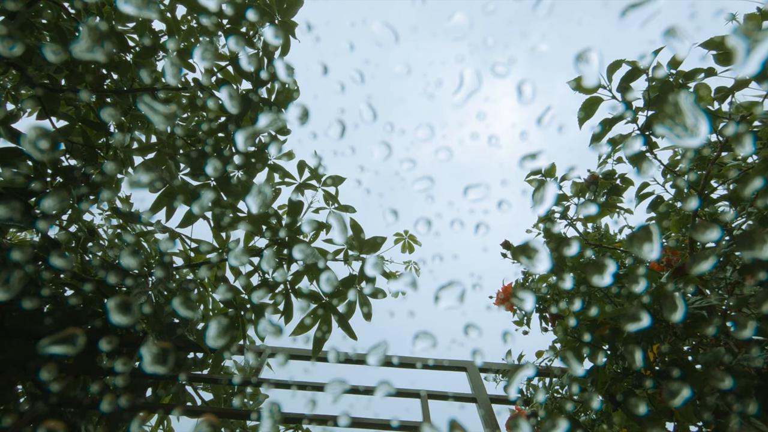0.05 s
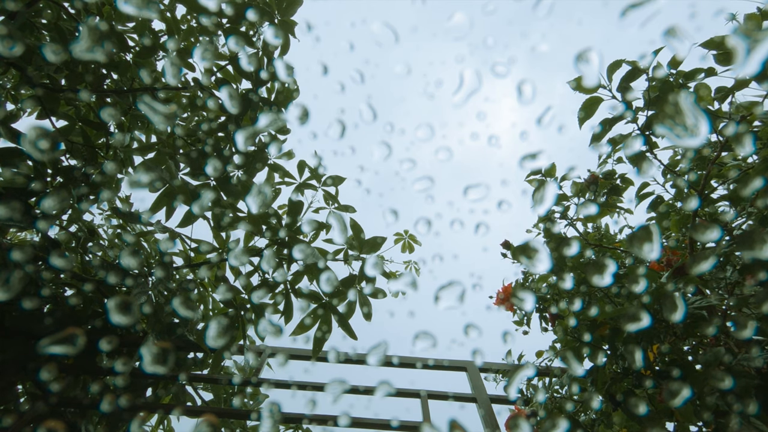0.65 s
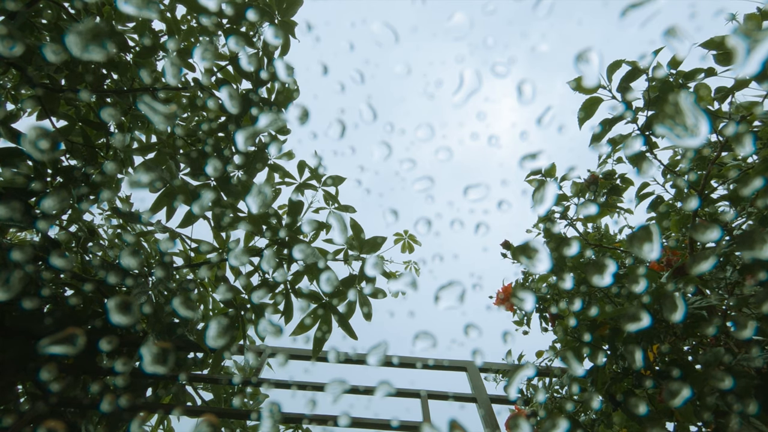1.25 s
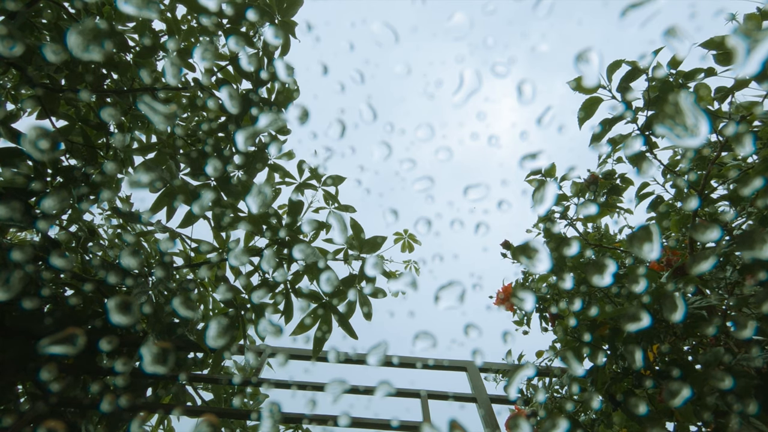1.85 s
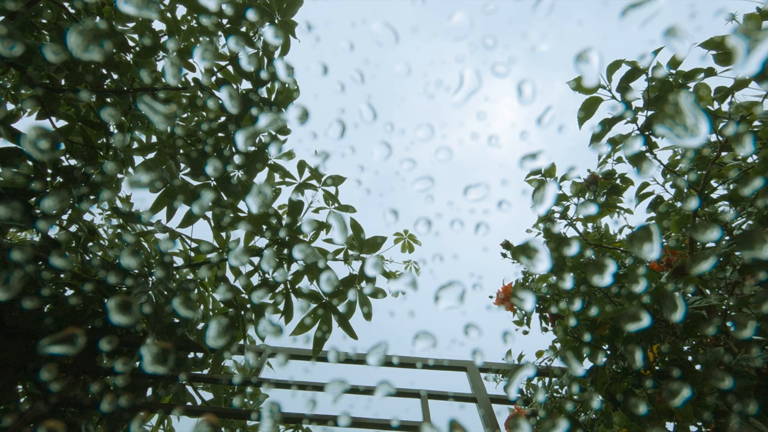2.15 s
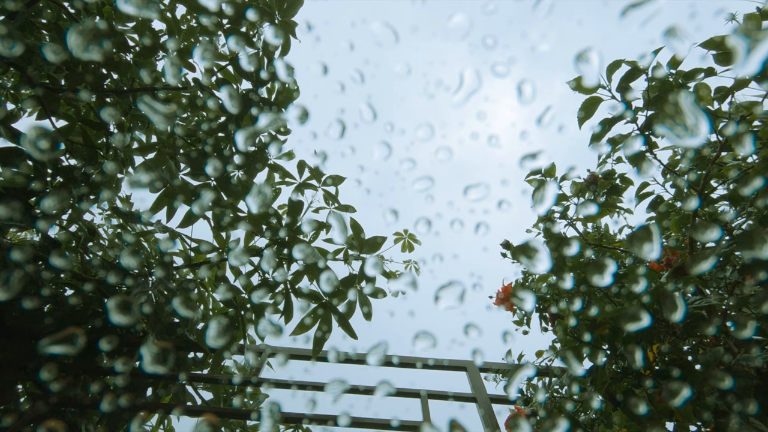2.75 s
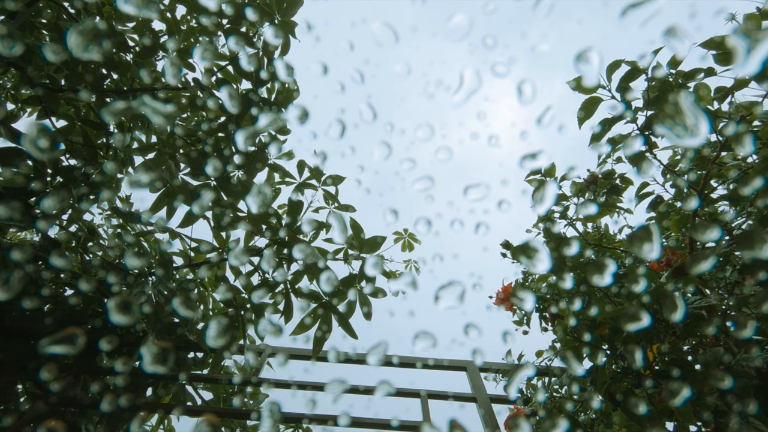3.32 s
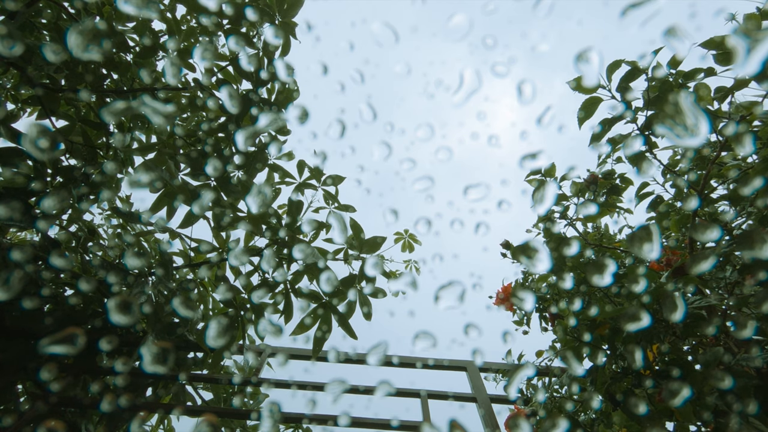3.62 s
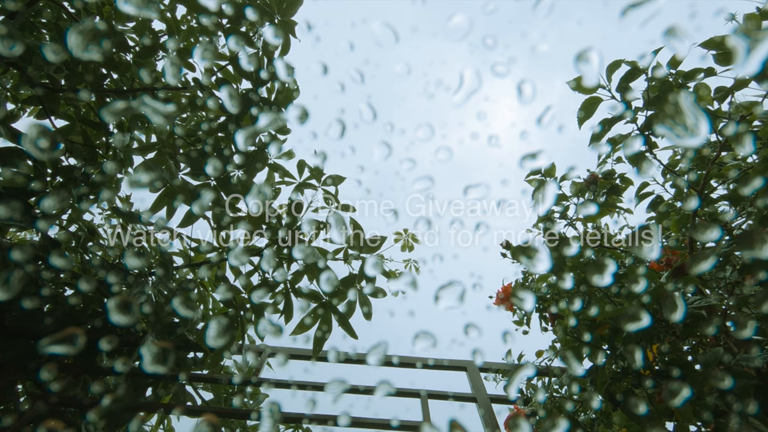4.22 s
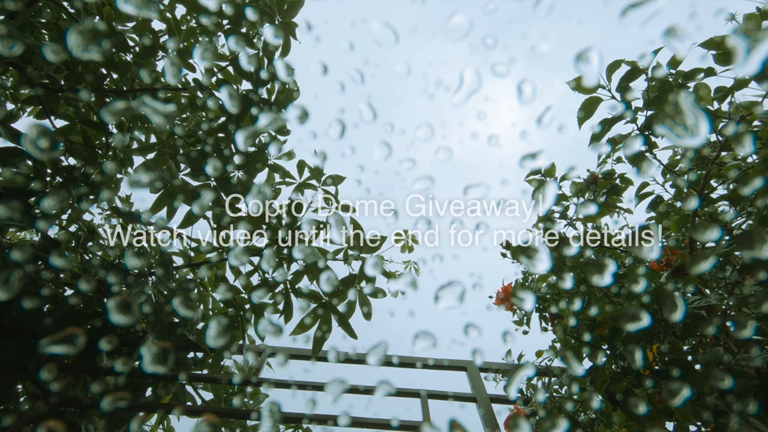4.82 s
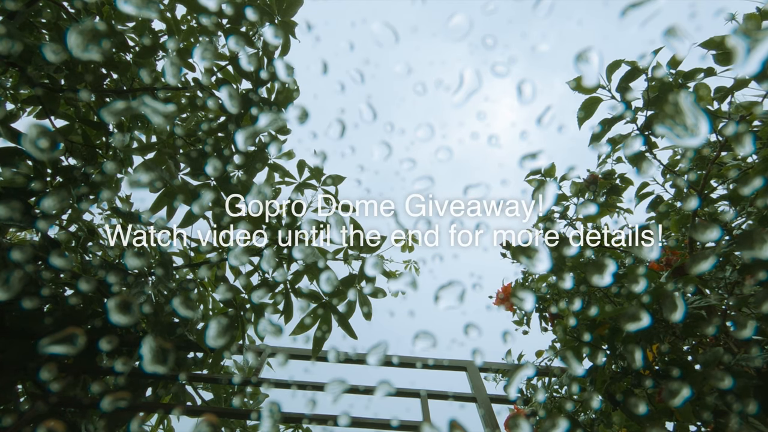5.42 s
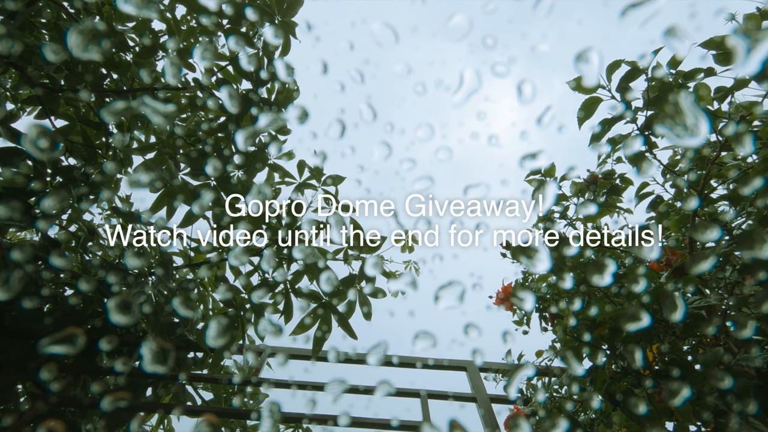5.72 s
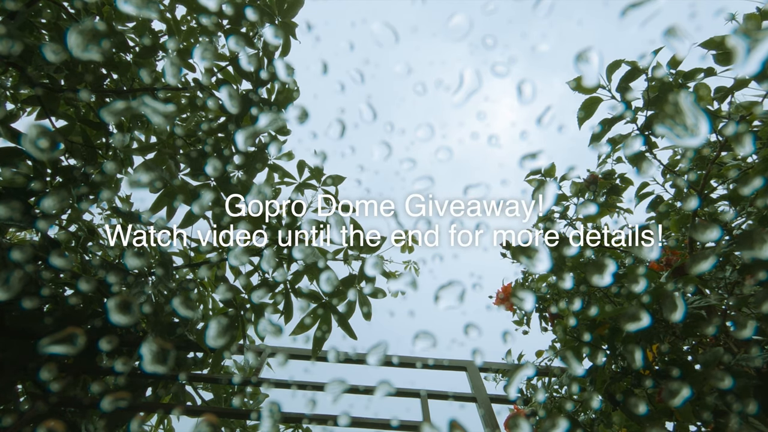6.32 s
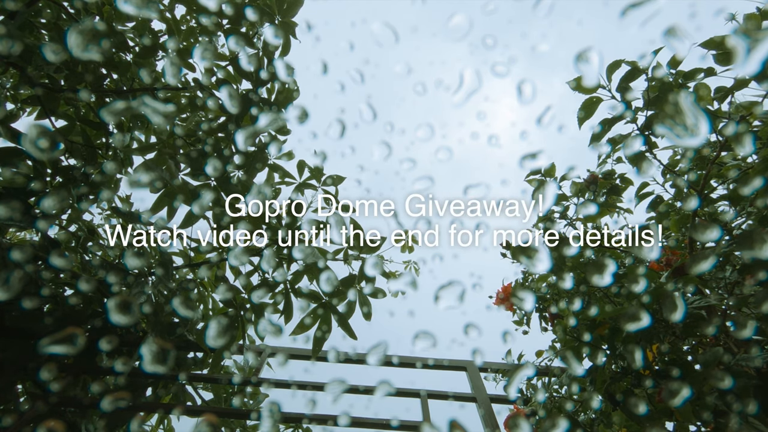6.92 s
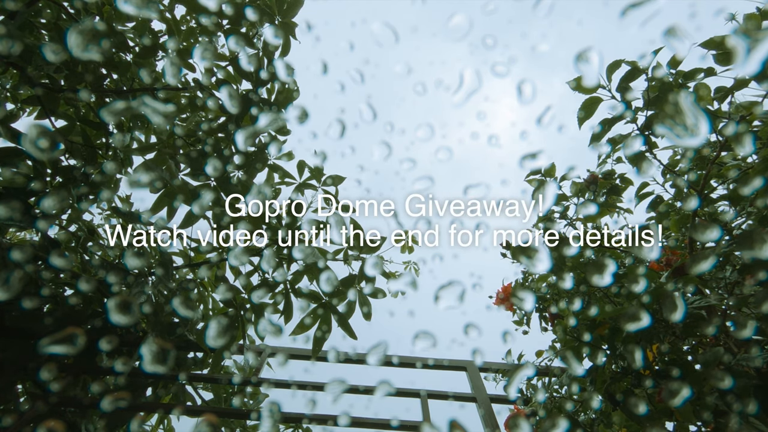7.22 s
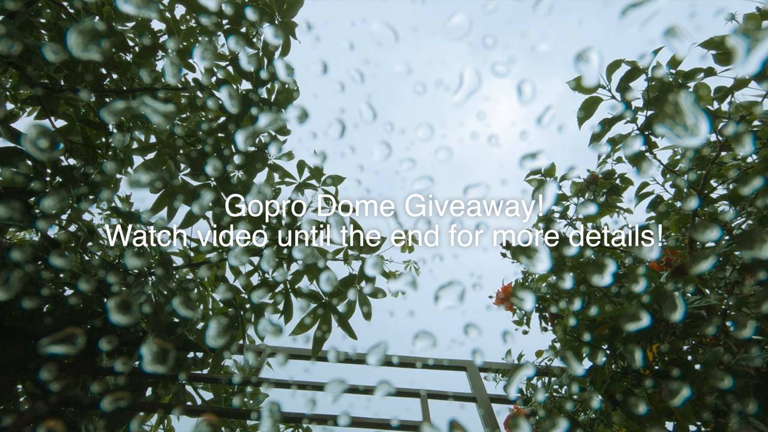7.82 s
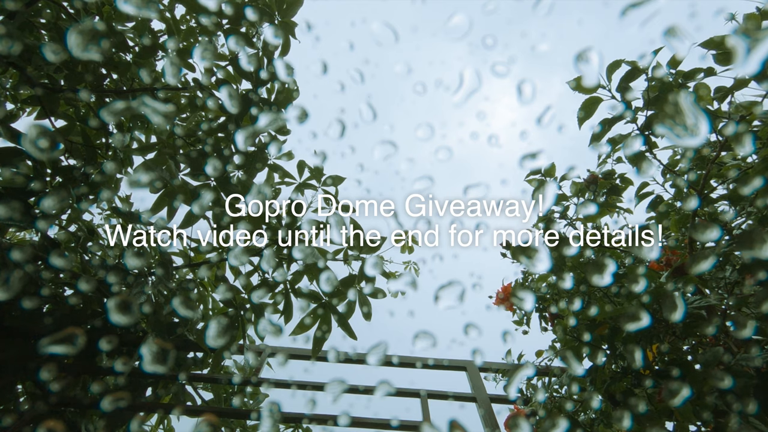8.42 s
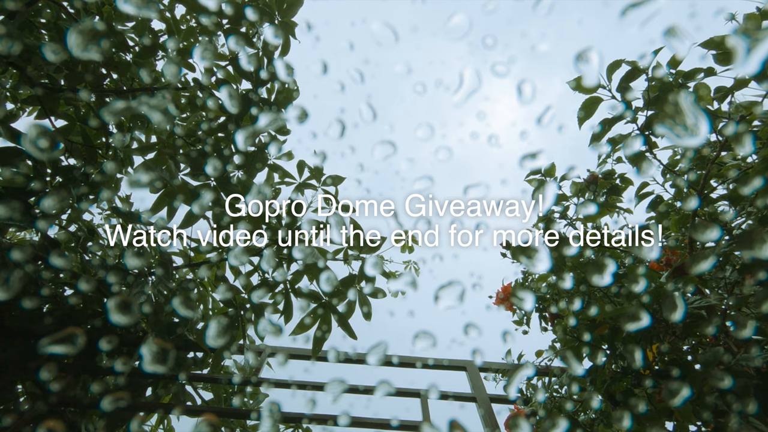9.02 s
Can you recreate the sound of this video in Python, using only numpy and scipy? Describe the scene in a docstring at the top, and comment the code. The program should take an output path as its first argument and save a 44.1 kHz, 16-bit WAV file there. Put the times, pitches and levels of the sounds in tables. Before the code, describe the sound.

Raindrops crack and tick unevenly on a plastic housing around the microphone, some bright, some dull, rocking it with small thumps. One early hit stands out, and the tapping carries on in clusters and short gaps. Small bubbly plops and fizzy splashes come from close by. Behind them are muffled outdoor drizzle, a faint hum and a low rumble that swells with puffs of air.

```python
"""Light rain outdoors, heard from inside a plastic dome housing. From the start, far rain comes dully through
the shell over a low rumble and a faint hum; fine spray ticks. Nearby drips plop, the low ones trapping a
bubble, the high ones tapping on leaves. From 0.07 s on, drops crack on the shell, ring it briefly and rock the
housing in a low thump, hardest at 1.9 s. In between, heavy drips burst into spray and soft low thuds nudge the
mount."""
import sys
import numpy as np
from scipy import signal
from scipy.fft import rfft, irfft, next_fast_len
from scipy.io import wavfile
from scipy.ndimage import map_coordinates

SR = 44100
rng = np.random.default_rng(int(sys.argv[2]) if len(sys.argv) > 2 else 0)


def store_pcm(level_fs):
    """Save levels as 16-bit WAV."""
    pcm = np.round(np.clip(level_fs, -1, 1) * 32767).astype(np.int16)
    wavfile.write(sys.argv[1], SR, np.atleast_2d(pcm).T)


N = 399537

# drops on the dome, relative levels: t/s, knock/dB, clack/dB, brightness/(dB/oct), thump/dB, spot f/Hz
DOME_DROPS = [(0.0707, -40.5, -51, -3.5, -38, 3360.0), (0.1247, -45.5, -51, -1, -41, 3290),
              (0.185, -41, -58, -15, -44.5, 2050), (0.2016, -38, -55.5, 0, -42.5, 3330),
              (0.265, -47, -47.5, -0.5, -44, 2420.0), (0.347, -40, -45, 2.5, -30, 3200),
              (0.3815, -37, -52.5, -15, -47, 2040), (0.4404, -50, -58.5, 0.5, -40.5, 2110),
              (0.5323, -45, -61.5, -9, -40, 2080), (0.599, -39, -59, 0, -40.5, 2030),
              (0.6722, -41.5, -58.5, -1.5, -44, 1430), (0.8042, -48, -51.5, -1, -41.5, 3320),
              (0.8858, -42.5, -52, -6, -46.5, 1790), (1.153, -42, -46.5, -5, -41, 2320),
              (1.1922, -36, -44, -7.5, -30, 3550), (1.221, -46, -61, -6, -36, 1680),
              (1.357, -45.5, -57.5, -4, -40, 1840), (1.603, -49, -56.5, -10, -40.5, 1820),
              (1.778, -46, -56, -15, -41, 2130), (1.8848, -44, -52.5, 8, -52, 3460),
              (1.896, -36, -52, -2, -27.5, 1970), (1.9406, -23, -32, 3, -18.5, 3550),
              (2.1147, -33.5, -44, 0.5, -34.5, 2420), (2.1817, -39, -42.5, -1.5, -31, 2400),
              (2.2155, -37, -47.5, 1, -30.5, 1620), (2.25, -45.5, -58, 4, -30.5, 3480.0),
              (2.5147, -42, -54.5, 10, -35.5, 3450), (2.5394, -46, -54.5, -3, -40, 2310.0),
              (2.702, -43, -60, -4, -37, 1450), (2.783, -48, -46, -2.5, -41.5, 2050),
              (2.8182, -40.5, -50.5, 0, -53, 2050.0), (2.946, -43.5, -50.5, 1.5, -38.5, 3540),
              (3.079, -39, -48, -1, -34.5, 3180), (3.0937, -30, -41.5, 0.5, -24.5, 3400),
              (3.5884, -62, -50, -2.5, -35, 2100), (3.738, -45.5, -60, 9, -38, 3900),
              (3.8851, -50, -62.5, 4.5, -41.5, 2040), (4.1135, -59, -51, -3, -36.5, 1820),
              (4.13, -38, -53, 0.5, -48, 2180), (4.2265, -32, -52, 5, -26.5, 3170),
              (4.2522, -47, -62, 8.5, -30.5, 3150.0), (4.2881, -42, -48.5, -5.5, -30, 3420),
              (4.3417, -43.5, -51, -1, -35, 3500), (4.459, -48, -57.5, 4, -44, 3270),
              (4.4819, -37.5, -45.5, -4.5, -37, 1540), (4.527, -39.5, -49, 0, -38.5, 2020.0),
              (4.5647, -45.5, -52.5, 2, -35, 3350), (4.764, -39.5, -54, -1, -38.5, 1560),
              (5.0131, -41.5, -57, -1, -39, 3500), (5.0865, -31.5, -39, 0, -28.5, 1560),
              (5.1405, -46.5, -59.5, -9, -38, 2330), (5.1967, -42, -54.5, 5.5, -55.0, 3440),
              (5.205, -51, -52, 6, -30, 3450.0), (5.229, -36, -60.5, 14.5, -33.5, 2900),
              (5.536, -43.5, -48, -2.5, -41.5, 1640.0), (5.978, -42, -50.5, -14, -35, 1830),
              (6.0828, -35, -40, -2, -24.5, 2455), (6.176, -43.5, -46.5, -2, -45, 1660),
              (6.237, -38.5, -50.5, 3, -39.5, 2030.0), (6.396, -47, -48.5, -0.5, -41.5, 2200),
              (6.5511, -45.5, -48.5, -4.5, -46, 1980), (6.7407, -37.5, -52.5, -0.5, -39.5, 1530),
              (6.7797, -38.5, -51.5, 1.5, -36.5, 3300), (6.975, -48, -55, -4.5, -56, 1560),
              (7.0182, -44, -48, -11, -45, 2120), (7.077, -33.5, -43.5, 0.5, -28, 3450),
              (7.2473, -44.5, -62.5, 5.5, -42.5, 1880), (7.6762, -30, -45, 3, -31, 2150),
              (7.689, -39, -42.5, 2, -45, 2430), (7.768, -54, -45.5, -6.5, -48, 2010),
              (7.867, -37.5, -49, 0, -36.5, 1520), (7.9456, -39, -49.5, 8, -32, 3360),
              (7.9767, -38.5, -52, 3.5, -39.5, 3350), (8.0866, -45, -47.5, -0.5, -41, 3400),
              (8.2047, -41.5, -55, -1.0, -42, 2310), (8.2964, -42.5, -56, -4.5, -60, 3100),
              (8.4988, -36.5, -56, -4, -29.5, 1620), (8.643, -51, -59.5, -2.5, -41, 1770),
              (8.7581, -49, -49.5, 4, -37, 3560), (8.866, -39, -49, 3.5, -34.5, 3320),
              (8.8761, -40, -48, 3, -36.5, 3400), (8.9414, -48, -54, 2.5, -43, 2480)]
# impact bands (knock, clack, tick, snap): low f/Hz, high f/Hz, t60/s, scatter/dB
IMPACT_BANDS = [(350, 1330, 0.017, -14), (1270, 5550, 0.014, -18.5), (4090, 10050, 0.014, -22.5),
                (8500, 12900, 0.011, -24.5)]
# shell response: f/Hz, mid/dB, side/dB
SHELL_COLOUR = [(294, 21.5, 28), (546, 15, 27.5), (690, 28.5, 35.5), (927, 32, 44.5), (1085, 24.5, 36.5),
                (1690, 26, 28.5), (2424, 31, 4), (2540, 20.5, 22.5), (3346, 25.5, 23), (4010, 13, 5),
                (5150, 9, 14.5), (7270, 10.5, 11.5), (10000, -1.5, -6.5), (13900, -17.5, -13)]


def amp(db):
    """Decibels to gain."""
    return 10 ** (np.asarray(db) / 20)


def unit(x):
    """x at rms 1."""
    return x / np.sqrt(np.mean(x ** 2) + 1e-20)


def wobble(rate_hz):
    """Smooth random curve with knots at rate_hz."""
    knots = rng.standard_normal(int(N * rate_hz / SR) + 4)
    return map_coordinates(knots, [np.arange(N) * rate_hz / SR])


def add(track, at_s, sound):
    """Mix a stereo sound into the track."""
    start = int(np.clip(round(at_s * SR), 0, N - 1))
    track[:, start:start + sound.shape[-1]] += sound[:, :N - start]


def bandpass(x, order, lo_hz, hi_hz):
    """Causal band filter."""
    return signal.sosfilt(signal.butter(order, [lo_hz, hi_hz], "band", fs=SR, output="sos"), x)


def coloured(x, colour):
    """Mid and side through a minimum-phase colour (f/Hz, mid/dB, side/dB), out as left and right."""
    size = 2 * next_fast_len(x.shape[-1] // 2 + 1024)
    hz, *levels_db = np.transpose(colour)
    log_hz = np.log(np.fft.rfftfreq(size, 1 / SR) + 1)
    cepstrum = irfft(np.log(amp([np.interp(log_hz, np.log(hz), db) for db in levels_db])))
    cepstrum[:, 1:size // 2] *= 2
    cepstrum[:, size // 2 + 1:] = 0
    mid_side = irfft(rfft(x, size) * np.exp(rfft(cepstrum)))[..., :x.shape[-1]]
    return np.array([[1, 1], [1, -1.18]]) @ mid_side


def swells(events, floor_db, attack_s, t60_s):
    """Envelope of a floor plus swells (t/s, hold/s, level/dB); powers add."""
    power = np.full(N + 2 * SR, amp(floor_db) ** 2)
    t = np.arange(SR) / SR
    for at_s, hold_s, db in events:
        shape = np.minimum(t / attack_s, 1) * amp(db - 60 * np.maximum(t - hold_s, 0) / t60_s)
        power[max(round(at_s * SR), 0):][:SR] += shape ** 2
    return np.sqrt(power[:N])


def far_rain():
    """Distant rain, dulled by the shell; its level wavers."""
    # rain spectrum: f/Hz, mid/dB, side/dB
    rain_colour = [(97, 3, -6), (135, 8, 0.5), (224.6, 9, 3), (249, -5, -4), (580, -21, -12),
                   (696, -13, -4), (944, -12, -1.5), (1096, -20.5, -9.5), (2010, -19.5, -19.5),
                   (2780, -30, -31), (4160, -32, -39.5), (5140, -31.5, -32), (7500, -32.5, -33),
                   (12450, -38, -39.5), (15200, -47, -47.5)]
    return unit(coloured(rng.standard_normal((2, N)), rain_colour)) * amp(-54 + 1.94 * wobble(12))


def mount_rumble():
    """The housing rumbles on its mount, swelling after thumps and in soft low thuds."""
    # rumble spectrum: f/Hz, mid/dB, side/dB
    rumble_colour = [(15, -18.5, -54), (27.3, -19.5, -39), (46.2, -6.5, -8), (56.5, -8.5, -14), (79, 6, -9),
                     (97.4, -2.5, -26), (141.6, -8.5, -17), (280, -48, -31), (895, -92, -105)]
    # soft low thuds: t/s, hold/s, level/dB
    soft_thuds = [(.55, 0.091, -45), (1.6, 0.021, -37.5), (3.605, 0.027, -44), (4.58, 0.19, -44),
                  (6.565, 0.021, -41.5), (6.63, 0.19, -47.5), (7.675, 0.032, -38.5)]
    thumps = [(at_s, 0.035, thump_db - 14.5) for at_s, _, _, _, thump_db, _ in DOME_DROPS]
    shudder = swells(thumps, floor_db=-59.5, attack_s=0.0073, t60_s=0.22)
    nudges = swells(soft_thuds, floor_db=-np.inf, attack_s=0.0051, t60_s=0.76)
    lumps = amp(3 * wobble(16))
    rumble = unit(lumps * coloured(rng.standard_normal((2, N)), rumble_colour))
    return rumble * np.hypot(shudder, nudges) * amp([[-1.3], [1.3]])


def hum():
    """Faint steady hum, opposite in polarity left and right."""
    # hum partials: f/Hz, level/dB
    partials = [(60, -65), (180, -58)]
    tone = sum(amp(db) * np.sin(2 * np.pi * hz * np.arange(N) / SR) for hz, db in partials)
    return np.outer([1, -1], tone)


def droplet_ticks(per_s=22, spread_db=19, t60_s=0.018):
    """Fine spray ticks on the shell at random."""
    t = np.arange(SR // 50) / SR
    out = np.zeros((2, N))
    for _ in range(int(per_s * N / SR)):
        envelope = amp(-81.5 - spread_db * rng.random() - 60 * t / t60_s)
        add(out, rng.random() * N / SR, envelope * rng.standard_normal((2, len(t))))
    return coloured(out, SHELL_COLOUR)


def drip_plops(t60_cycles=25, attack_cycles=3.05, rise_per_s=1.2, left_lag_s=0.00049, splash_t60_s=0.029):
    """Each drip splashes and rings with a quivering tone whose pitch climbs as it fades: low ones trap a
    bubble, high ones tap on leaves."""
    # nearby drips, in puddles and on leaves: t/s, relative level/dB, pitch f/Hz
    drips = [(.004, -35, 783), (.181, -39.5, 2090), (.535, -40.5, 730), (1.243, -39, 880),
             (1.358, -39, 817), (1.608, -49, 527), (1.728, -40, 820), (1.78, -35, 844), (2.92, -47, 770),
             (2.975, -45, 740), (3.628, -39.5, 760), (3.965, -41, 835), (4.367, -53, 3350),
             (4.595, -39.5, 820), (4.624, -46.5, 3250), (5.458, -52, 2320), (6.142, -39.5, 740),
             (6.2, -47, 1520), (7.155, -44.5, 750), (7.802, -47, 3230), (7.827, -35, 747),
             (7.829, -47, 2750)]
    t = np.maximum(np.arange(SR // 8) / SR - np.array([[left_lag_s], [0]]), 0)
    out = np.zeros((2, N))
    for at_s, db, hz in drips:
        cycles = hz * (t + rise_per_s * t ** 2 / 2)
        quiver_rad = 0.4 * map_coordinates(rng.standard_normal(len(t[0])), [cycles / 2], mode="nearest")
        envelope = amp(-60 * cycles / t60_cycles) * (1 - np.exp(-cycles / attack_cycles)) ** 2
        bubble = np.sin(2 * np.pi * cycles + quiver_rad) * envelope
        noise = unit(bandpass(rng.standard_normal(t.shape), 2, hz / np.sqrt(2), 2 * hz))
        splash = noise * amp(-28 - 60 * t / splash_t60_s) * (1 - np.exp(-cycles))
        add(out, at_s, amp(db + 11.5) * (bubble + splash))
    return out


def impacts(bands_db, attack_s=0.00025, scatter_t60_s=0.29, light_drop_db=-52.5):
    """Splat: a sharp push and short burst through the shell, then scatter that grows less than the blow."""
    t = np.arange(SR // 8) / SR
    push = 3.14 * rng.choice([-1, 1], (len(bands_db), 2, 1)) * (t == 0)
    push = np.roll(push, round(attack_s * SR), axis=-1)
    taps = 0
    for (lo_hz, hi_hz, t60_s, scatter_db), db in zip(IMPACT_BANDS, bands_db.T):
        tail_db = scatter_db - 0.69 * np.maximum(db - light_drop_db, 0)[:, None, None]
        decay = amp(-60 * t / t60_s) + amp(tail_db - 60 * t / scatter_t60_s)
        noise = decay * (1 - np.exp(-t / attack_s)) * rng.standard_normal((len(db), 2, len(t)))
        burst = bandpass(coloured(push + noise, SHELL_COLOUR), 3, lo_hz, hi_hz)
        rms = np.sqrt(np.mean(burst ** 2, axis=(1, 2)))
        taps = taps + burst * (amp(db - 15.5) / rms)[:, None, None]
    return taps


def pings(clack_db, spot_hz, t60_cycles=44, attack_s=0.00018):
    """The mode under the landing spot answers most strongly and gives each tap its pitch."""
    t = np.arange(SR // 8) / SR
    phase_rad = rng.uniform(0, 2 * np.pi, (len(spot_hz), 1, 1)) + np.array([[0], [0.9]])
    cycles = spot_hz[:, None, None] * t
    decay = amp(clack_db[:, None, None] + 4.5 - 60 * cycles / t60_cycles)
    return np.sin(2 * np.pi * cycles + phase_rad) * decay * (1 - np.exp(-t / attack_s))


def shell_ring(bands_db, spot_hz, spread_db=3, detune=0.02, attack_s=0.000057):
    """The landing spot favours modes near its pitch; water on the shell detunes them from drop to drop."""
    # shell modes: f/Hz, relative level/dB, t60/s
    shell_modes = [(875, -0.5, 0.029), (995, -13.5, 0.094), (1285, -4, 0.038), (1614, -6.5, 0.057),
                   (2014, -2.5, 0.055), (2410, -2.5, 0.029), (2855, -12.5, 0.085), (3360, -2, 0.014),
                   (3960, -15, 0.1), (4800, -9, 0.058), (6300, -5.5, 0.013), (7500, -21, 0.04)]
    hz, mode_db, t60_s = np.transpose(shell_modes)
    t = np.arange(SR // 8) / SR
    log_centres = [np.log(lo * hi) / 2 for lo, hi, *_ in IMPACT_BANDS]
    drive_db = np.array([np.interp(np.log(hz), log_centres, row) for row in bands_db])
    away_oct = np.minimum(abs(np.log2(hz / spot_hz[:, None])), 0.5)
    draws = rng.standard_normal((len(bands_db), 4, len(hz)))  # level, left phase, right phase, tuning
    level_db = drive_db + mode_db + 0.5 - 17 * away_oct + spread_db * draws[:, 0]
    strength = amp(level_db)[:, None] * np.exp(2j * np.pi * draws[:, 1:3])
    wet_hz = hz * (1 + detune * draws[:, 3])
    envelope = amp(-60 * t / t60_s[:, None]) * (1 - np.exp(-t / attack_s))
    modes = np.exp(2j * np.pi * wet_hz[..., None] * t) * envelope
    return (strength @ modes).real


def housing_thump(thump_db, spot_hz, lag_s=0.0019, attack_s=0.0023, heavy_drop_db=-31.5):
    """A drop rocks the housing; heavy ones favour the low modes, and the landing spot sets the boom."""
    # rocking modes: f/Hz, relative level/dB, t60/s, left minus right/dB, boom/(dB/oct of lower spot pitch)
    housing_modes = [(47.4, -20.5, 0.45, -4, 0), (75.5, -18.5, 0.48, 8, 0.5), (98.7, -5.5, 0.18, -3.5, 1),
                     (139.56, 1, 0.28, -4.5, 0), (215.6, -9, 0.22, -8.5, 8), (295, 3, 0.0077, -12.5, 5)]
    hz, mode_db, t60_s, lean_db, boom_db_oct = np.transpose(housing_modes)
    t = np.maximum(np.arange(SR // 2) / SR - lag_s, 0)
    heft_db = 0.59 * max(thump_db - heavy_drop_db, 0) * np.maximum(np.log2(140 / hz), 0)
    boom_db = boom_db_oct * np.log2(2400 / spot_hz)
    level_db = mode_db + thump_db + heft_db + boom_db + rng.standard_normal(len(hz))
    envelope = amp(-60 * t / t60_s[:, None]) * (1 - np.exp(-t / attack_s)) ** 2
    modes = np.sin(2 * np.pi * hz[:, None] * t) * envelope
    return amp(level_db + np.array([lean_db, -lean_db]) / 2) @ modes


def dome_drops():
    """Splat, ping, ring and thump: bright on bare shell, dull where water cushions the drop."""
    # ordinary drop, relative to its clack: clack/dB, tick/dB, snap/dB
    voice_db = [0, -2.5, -18.5]
    times_s, knock_db, clack_db, tilt_db_oct, thumps_db, spots_hz = np.transpose(DOME_DROPS)
    centres_oct = np.log2([lo * hi for lo, hi, *_ in IMPACT_BANDS[1:]]) / 2
    upper_db = clack_db[:, None] + voice_db + tilt_db_oct[:, None] * (centres_oct - centres_oct[0])
    bands_db = np.column_stack([knock_db, upper_db])
    taps = impacts(bands_db) + pings(clack_db, spots_hz) + shell_ring(bands_db, spots_hz)
    out = np.zeros((2, N))
    for at_s, tap, thump_db, spot_hz in zip(times_s, taps, thumps_db, spots_hz):
        add(out, at_s, tap)
        add(out, at_s, housing_thump(thump_db, spot_hz))
    return out


def splash_spray(hold_s=0.035, grains_per_s=1000, grain_spread_db=2):
    """Heavy drips burst into a fizz of tiny droplets over a floor of drizzle."""
    # nearby splashes: t/s, level/dB
    splashes = [(0.169, -67), (.28, -62), (.88, -61), (1.17, -69), (1.55, -66.5), (3.17, -70.5),
                (3.58, -70), (4.23, -64), (4.45, -66), (5.52, -67), (5.84, -69), (6.23, -63.5), (6.41, -65),
                (7.0, -68), (7.25, -65), (7.37, -68), (7.53, -67), (7.78, -67.5), (8.1, -71), (8.33, -64.5),
                (8.88, -73)]
    # spray spectrum: f/Hz, mid/dB, side/dB
    spray_colour = [(400, -20.5, -21), (980, 6.5, 7.5), (1210, 1, -3.5), (1980, 3, 3.5), (2640, -7.5, -11),
                    (3540, -3, -6.5), (4100, -15, -13), (5730, -10.5, -9), (7950, -15.5, -14.5),
                    (14900, -32, -41)]
    bursts = [(at_s, hold_s, db) for at_s, db in splashes]
    envelope = swells(bursts, floor_db=-76, attack_s=0.011, t60_s=0.96)
    grains = amp(grain_spread_db * wobble(grains_per_s)) * rng.standard_normal((2, N))
    flicker = amp(3.3 * wobble(65))
    return unit(coloured(grains, spray_colour)) * envelope * flicker


def scene():
    """Everything as heard inside the dome, leaning slightly right."""
    water = dome_drops() + droplet_ticks() + drip_plops() + far_rain() + splash_spray()
    return (water + mount_rumble() + hum()) * amp([[-0.2], [0.2]])


def record(dry):
    """The camera in the dome keeps nothing above its band limit."""
    limit_hz = 15000
    size = next_fast_len(N + SR // 2)
    passband = np.fft.rfftfreq(size, 1 / SR) < limit_hz
    return irfft(rfft(dry, size) * passband, size)[:, :N]


dry = scene()
out = record(dry)
store_pcm(out)
```